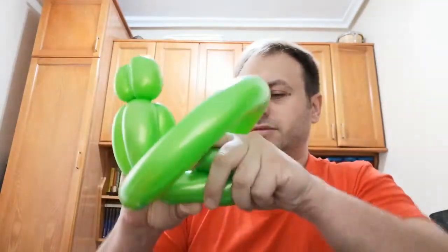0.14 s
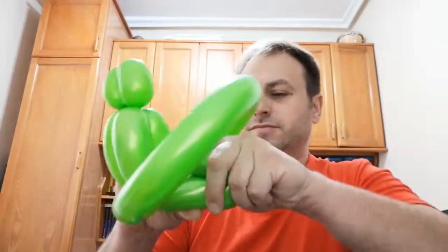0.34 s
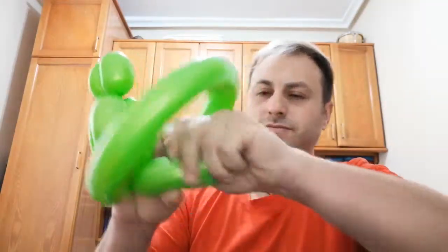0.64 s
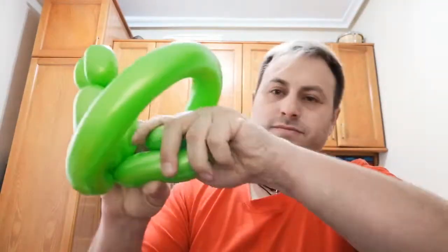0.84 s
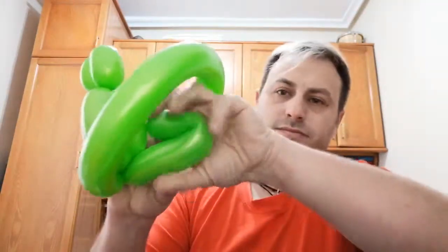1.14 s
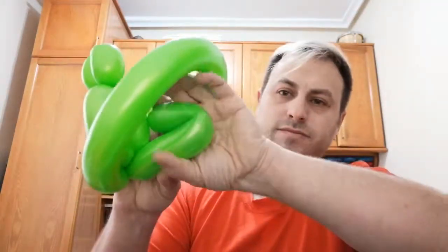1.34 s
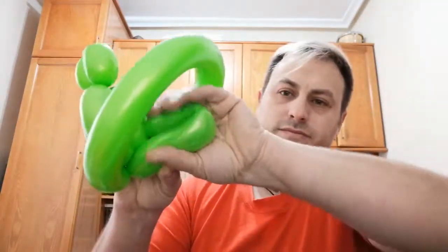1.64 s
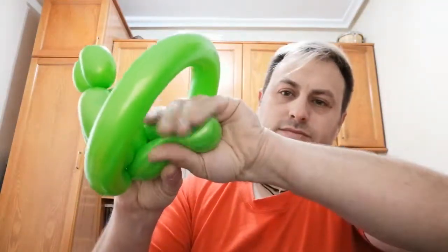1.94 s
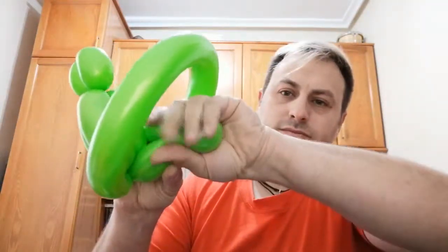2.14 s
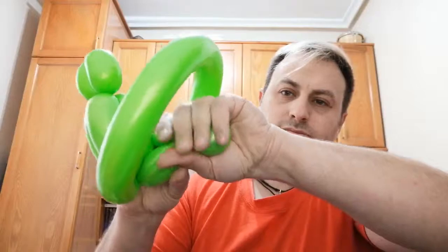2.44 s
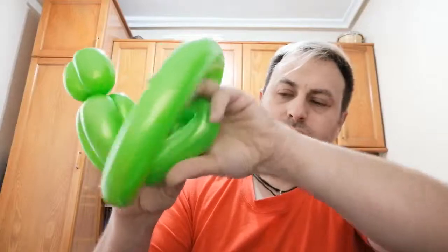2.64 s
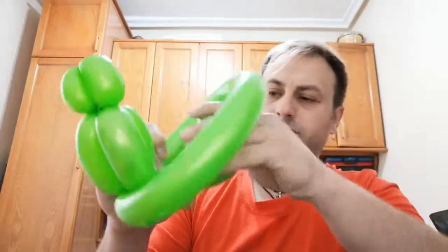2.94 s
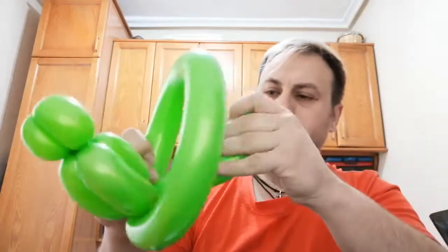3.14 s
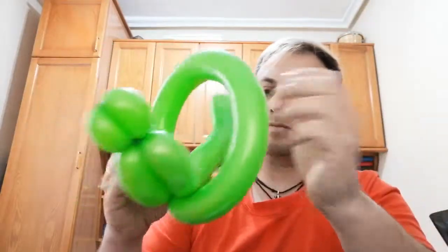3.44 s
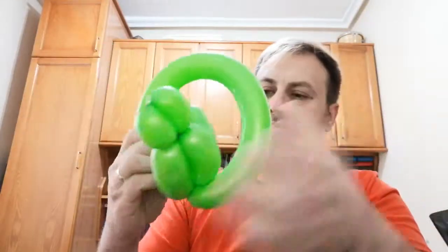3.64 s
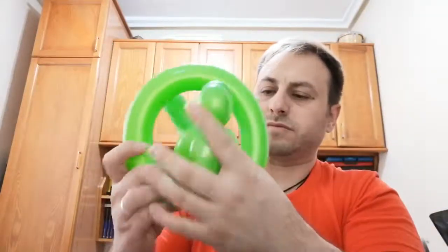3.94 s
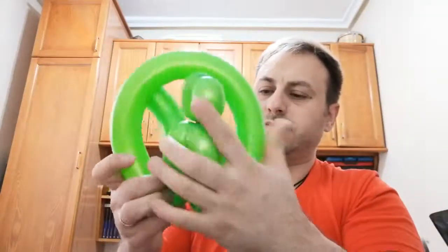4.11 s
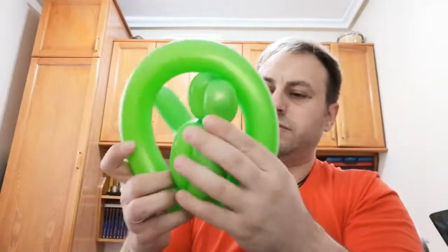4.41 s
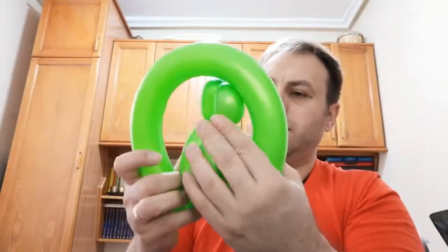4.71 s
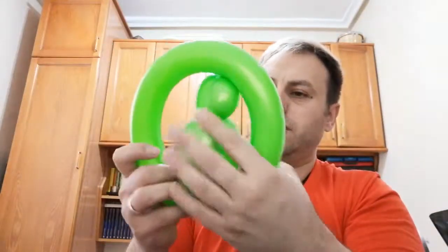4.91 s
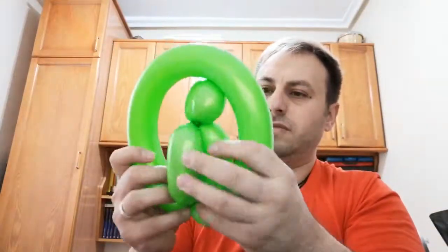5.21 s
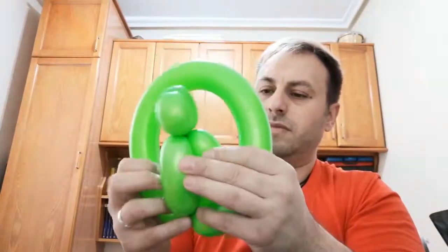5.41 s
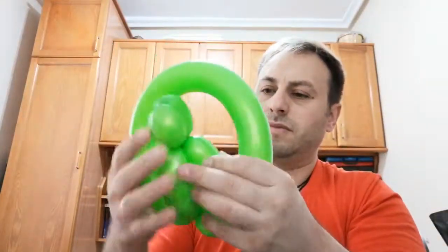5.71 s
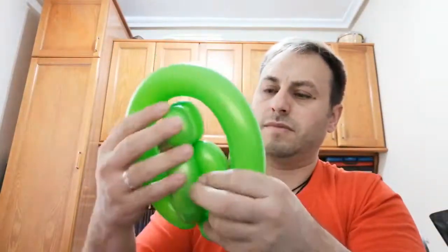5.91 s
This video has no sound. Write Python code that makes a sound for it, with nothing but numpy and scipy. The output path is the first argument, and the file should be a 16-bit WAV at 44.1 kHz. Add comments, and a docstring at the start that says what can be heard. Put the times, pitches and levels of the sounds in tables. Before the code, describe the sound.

Latex rubs on latex and under fingertips, right beside a pair of microphones. It begins with a soft scrape and scattered snaps, gives a quick strong creak, thins out for a moment, then a fast squeak leads into denser snapping. Later strokes drag and groan with low balloon knocks, and a short high chirp stands out before the last crackles. Small indoor room, short tail, very quiet background.

```python
"""A small room, a microphone pair close to twisted latex balloons that are turned and adjusted by hand.
The taut skin sticks and slips: snaps, squeaky runs, short cheeps and fine crackle, built from decaying
sines and shaped noise bursts. Creeping skin sings thinly as narrow-band noise. Fingers drag with a hollow
groan and bump with low thuds. Decaying noise gives the short wall tail, steady low noise the room air."""
import sys
import numpy as np
from scipy import signal
from scipy.fft import rfft, irfft
from scipy.io import wavfile
from scipy.ndimage import uniform_filter1d

SR = 44100
rng = np.random.default_rng(int(sys.argv[2]) if len(sys.argv) > 2 else 0)


def file_out(sig):
    """Save sig as 16-bit WAV at sys.argv[1]."""
    # one column per channel
    cols = np.atleast_2d(sig).T
    # limit, then scale
    lim = np.clip(cols, -1, 1)
    pcm = np.round(lim * 32767).astype(np.int16)
    wavfile.write(sys.argv[1], SR, pcm)


N = 267157
TIME = np.arange(N) / SR
SLIP_S, BLOW_S = .0136, .005  # length of one slip sound; its first part, over which its level is set


def undb(db):
    """Decibels to gain."""
    return 10 ** (np.asarray(db) / 20)


def unit(x):
    """Scale to rms 1."""
    return x / np.sqrt(np.mean(x ** 2))


def colour(x, points, size=2048):
    """Causal minimum-phase filter with the given (Hz, dB) response."""
    hz, db = np.transpose(points)
    grid = np.log(np.fft.rfftfreq(size, 1 / SR) + 1)
    log_gain = np.interp(grid, np.log(hz), db) * np.log(10) / 20
    # folding the cepstrum onto positive time makes the response causal
    cepstrum = irfft(log_gain)[:size // 2]
    cepstrum[1:] *= 2
    response = irfft(np.exp(rfft(cepstrum, size)))[:min(size // 2, x.shape[-1])]
    response = response.reshape((1,) * (x.ndim - 1) + (-1,))
    return signal.fftconvolve(x, response, axes=-1)[..., :x.shape[-1]]


def lay(times, sounds, db):
    """Put short stereo sounds on the time line, each with its rms level set over the first BLOW_S."""
    size = sounds.shape[-1]
    out = np.zeros((2, N + size))
    blow_rms = np.sqrt(np.mean(sounds[..., :int(BLOW_S * SR)] ** 2, axis=(1, 2)))
    gains = undb(db) / blow_rms
    starts = np.clip(times * SR, 0, N - 1).astype(int)
    for start, sound, gain in zip(starts, sounds, gains):
        out[:, start:start + size] += gain * sound
    return out[:, :N]


def wander(span_s):
    """A smooth random drift of rms 1: noise averaged twice over span_s."""
    size = int(span_s * SR) + 1
    smooth = uniform_filter1d(rng.standard_normal(N), size)
    return unit(uniform_filter1d(smooth, size))


def low_noise(points, spread):
    """Coloured noise, mostly alike on both sides; spread is the part that differs."""
    noise = rng.standard_normal((3, N))
    return unit(colour(noise[:1] + spread * noise[1:], points))


def gesture(start, length, attack_s, ease_db_per_s, release_s):
    """Envelope of one movement: an attack centred on start, a slowly easing hold, an exponential release."""
    t = TIME - start
    attack = np.clip(t / attack_s + .5, 0, 1)
    hold = undb(-ease_db_per_s * np.clip(t, 0, length))
    return attack * hold * np.exp(-np.maximum(t - length, 0) / release_s)


def bursts(count, decay_s, spread, rise_s=0.00013):
    """Short noisy ripples of the skin; spread is the part that differs between left and right."""
    t = np.arange(int(SLIP_S * SR)) / SR
    noise = rng.standard_normal((count, 3, len(t)))
    envelope = np.exp(-t / decay_s) * (1 - np.exp(-t / rise_s))
    return (noise[:, :1] + spread * noise[:, 1:]) * envelope


def tear(sounds, stage=0.51, stage_s=.003):
    """Contact lets go in two stages: a second release of random strength 0.9 to 3.9 ms later."""
    chance = rng.uniform(0, 1, (len(sounds), 2, 1))
    f = np.fft.rfftfreq(sounds.shape[-1], 1 / SR)
    lag_s = stage_s * (0.2983 + chance[:, 1:])
    again = 2 * stage * chance[:, :1] * np.exp(-2j * np.pi * f * lag_s)
    return irfft(rfft(sounds) * (1 + again), sounds.shape[-1])


# The voice of the taut skin. Each row: frequency in Hz, gain in dB.
SKIN_COLOUR = [(400, -3.5), (720, 1.5), (1050, 8.5), (1280, 1.5), (1600, 3.5), (2150, -5.5), (2450, 2.5),
               (3100, -6.5), (4500, -23)]


def rings(hz, decay_s=0.00076, rise_s=0.00021, sag=0.32, sag_s=0.0011, ripple_db=-5,
          ripple_s=0.0038, width_hz=1700, echo=0.73, echo_s=0.00247):
    """A released patch of latex swings a few cycles, sinking in pitch; ripples scatter round the balloon."""
    t = np.arange(int(SLIP_S * SR)) / SR
    chance = rng.standard_normal((len(hz), 2, 1))
    hz = hz[:, None, None]
    fade = decay_s * np.exp(0.14 * chance[:, :1])
    # the pitch starts 15 % above the nominal ring and sinks to 13 % below it
    stretch = t + sag * sag_s * (1 - np.exp(-t / sag_s))
    swing = np.sin(2 * np.pi * 0.87 * hz * stretch)
    swing *= (1 - np.exp(-t / rise_s)) * np.exp(-t / fade)
    swing *= np.sign(chance[:, 1:])  # pushes or pulls at random
    f = np.fft.rfftfreq(len(t), 1 / SR) + 1
    # the neighbouring balloons throw the swing back, a little differently to each side
    lag_s = echo_s * rng.uniform(0.425, 1, (len(hz), 2, 1))
    swing = irfft(rfft(swing) * (1 + echo * np.exp(-2j * np.pi * f * lag_s)), len(t))
    resonance = 1 / (1 + 1j * (f ** 2 - hz ** 2) / (f * width_hz))
    ripples = irfft(rfft(bursts(len(hz), ripple_s, spread=0.86)) * resonance ** 2, len(t))
    return colour(unit(swing) + undb(ripple_db) * unit(ripples), SKIN_COLOUR)


# The bright crack at the contact, also heard in the hiss. Each row: frequency in Hz, gain in dB.
CRACK_COLOUR = [(1760, -13.5), (3000, -1.5), (4290, -5.5), (5230, -4), (6130, -9.5), (7590, -8.5),
                (8350, -15.5), (9070, -9), (10300, -11.5), (11500, -9), (15500, -33)]
# The knock of the enclosed air. Each row: frequency in Hz, gain in dB.
BODY_COLOUR = [(50, -11.5), (95, -5), (150, 2), (230, -3.5), (360, -1.5), (520, 3.5), (750, -6.5),
               (1200, -21.5)]
# Snaps that stand out, close to the pair. Each row: start in seconds, ring level in dB,
# nominal ring in Hz, crack in dB over the ring, body in dB over the ring.
SNAPS = [(0.1315, -21, 2040, -11.5, -11.5), (0.1664, -25, 1960, -13, -11), (.281, -39, 1250, -14, -16),
         (0.5444, -30, 2400, -0.5, -15), (0.5524, -20.5, 1830, -2, -10.5), (0.6227, -29, 2550, 4, -29),
         (0.674, -19.5, 2020, -1, -40), (.6907, -23, 2000, 1.5, -53), (0.7003, -21.5, 2000, -13, -40),
         (0.8241, -33.5, 2070, -12, -30), (0.8784, -29.5, 2200, -13, -20), (0.893, -27, 2170, -7.5, -33),
         (0.9463, -27, 2120, -13, -23), (1.0387, -24, 1980, -8.5, -30), (1.137, -32.5, 2100, 0.5, -16),
         (1.158, -29.5, 2130, -4, -13), (1.402, -26.5, 1970, -13, -32), (1.419, -21, 1680, -9, -25),
         (1.661, -32, 2000, -13, -40), (1.672, -27, 2020, -9, -45), (1.7559, -21.5, 1830, -9, -27),
         (1.767, -13.5, 2030, -13.5, -16.5), (1.875, -30.5, 1800, -8.5, -8.5),
         (2.0263, -22.5, 1900, 0.5, -17.5), (2.1995, -37, 1860, -2, -10), (2.4134, -42, 1790, 7, -18),
         (2.4315, -23.5, 2000, -7, -15), (2.7503, -20, 2050, -4, -17), (2.8094, -15.5, 2000, -3.5, -17),
         (2.9116, -17, 2090, -4, -9.5), (3.0177, -20, 1900, -13, -9.5), (3.0446, -20, 2260, -6.5, -8),
         (3.0561, -19, 1840, -10, -15), (3.0826, -28.5, 1830, 1.5, -24), (3.146, -27, 1880, -2.5, -14),
         (3.3485, -27.5, 2290, 1, -16), (3.4776, -31.5, 1910, 1.5, -5), (3.6225, -33, 1760, 1.5, -32),
         (3.652, -29.5, 1590, -1, -20), (3.693, -25, 1860, -2.5, -17), (3.7301, -23, 1880, -5.5, -8),
         (3.7847, -24.5, 1850, -8, -14.5), (3.843, -17, 1840, -6, -12.5), (3.881, -19.5, 2090, -7.5, -25),
         (3.924, -22, 2000, -6, -16), (4.267, -26.5, 2110, -2, -4.5), (4.331, -24.5, 1830, -10, -8),
         (4.3792, -18, 1700, -7.5, -10), (4.4113, -21, 2040, -14, -23), (4.4689, -17, 1690, -7.5, -11),
         (4.5791, -25.5, 2100, -22, -17), (4.6129, -19.5, 1300, -7, -7), (4.6805, -26.5, 2070, -15, -5),
         (4.7152, -24, 1340, -13, -10), (4.749, -29.5, 1970, -10, -17), (4.917, -26, 1590, -9.5, -9),
         (5.1598, -23.5, 1770, -14.5, -8), (5.1939, -28, 1970, -9, -3), (5.2318, -24, 1880, -12, -10),
         (5.2994, -20.5, 2000, -7, -20), (5.313, -15, 1320, -26, -5.5), (5.5026, -17.5, 2270, -6, -14.5),
         (5.5079, -15.5, 2220, -19, -7.5), (5.573, -20.5, 2010, -11, -10.5), (5.7693, -28, 2000, -8.5, -17),
         (5.9349, -21.5, 1960, -5.5, -21), (5.9844, -26, 1910, -14, -31)]


def snaps(times, db, hz, crack_db, body_db, sharp=0.12, sharpen=0.14, lean_db=0.73):
    """Each slip gives a ring, a bright crack at the contact and a knock of the enclosed air."""
    crack = tear(bursts(len(times), decay_s=.001, spread=3.25))
    # the harder the crack, the further up its treble reaches
    edge = np.clip(sharp + sharpen * crack_db, -.8, .8).reshape(-1, 1, 1)
    crack = colour(crack - edge * np.roll(crack, 1, axis=-1), CRACK_COLOUR)
    body = colour(bursts(len(times), decay_s=0.0037, spread=3.5), BODY_COLOUR)
    ring = rings(hz) * undb(lean_db * np.array([[1], [-1]]))  # leans to the left
    return lay(times, ring, db) + lay(times, crack, db + crack_db) + lay(times, body, db + body_db)


# Runs of slips, from slow creaks to quick squeaks. Each row: start in seconds, length in seconds,
# first rate in Hz, last rate in Hz, first ring level in dB, last ring level in dB, nominal ring in Hz,
# crack in dB over the ring, body in dB over the ring.
SQUEAKS = [(0.0513, 0.015, 148.8, 150.3, -31, -23, 1890, -32, -27),
           (0.702, 0.014, 247, 328, -30, -32, 1960, -7, -27),
           (.968, 0.028, 136.2, 127.8, -32.5, -22, 2000, -6.5, -37),
           (1.067, 0.031, 153.7, 168.2, -29, -30, 2180, -3, -34),
           (1.221, 0.031, 197.8, 171, -22.5, -33.5, 2040, -7, -18.5),
           (1.261, .13, 99.7, 87.6, -34.5, -38.5, 2200, -6, -18),
           (1.4327, 0.082, 117.6, 44, -16, -13, 1910, -9, -14),
           (1.947, .045, 49.1, 48.9, -27.5, -24.5, 1900, -4.5, -18),
           (2.582, 0.044, 124.4, 420.4, -28.5, -17.5, 1780, -6.5, -12),
           (3.237, 0.033, 93.6, 93.3, -32.5, -33, 2130, -2.5, -17),
           (3.8957, 0.017, 198.5, 268.7, -24, -27.5, 1820, -11, -12),
           (4.069, 0.016, 130.5, 131.3, -24, -23.5, 1810, -3.5, -13),
           (4.516, .013, 281, 402, -25, -26.5, 1110, -10, -11),
           (4.842, .09, 66.1, 69.7, -29.5, -30, 1730, -13.5, -11),
           (4.995, 0.072, 169.4, 139, -34, -39.5, 1150, -12, -12),
           (5.8672, 0.02, 79.6, 140.7, -22.5, -27.5, 2300, -8, -31)]


def squeak(start, length, first_hz, last_hz, first_db, last_db, ring_hz, crack_db, body_db, detune=0.038):
    """A run of slips whose rate rises or falls with the speed of the hand."""
    t = np.arange(0, length, 1 / SR)
    rate = np.geomspace(first_hz, last_hz, len(t))
    cycles = np.floor(np.cumsum(rate) / SR)
    times = t[np.diff(cycles, prepend=-1) > 0]  # one slip at each new cycle
    db = np.interp(times, [0, length], [first_db, last_db])
    hz = ring_hz * np.exp(detune * rng.standard_normal(len(times)))
    return snaps(start + times, db, hz, crack_db, body_db)


# Short shrill cheeps. Each row: start in seconds, level in dB, pitch in Hz.
CHEEPS = [(5.5019, -13.5, 1287), (5.508, -23, 1280), (5.5172, -20.5, 1307)]


def cheeps(swell_s=0.0017, overtones_db=(-1, 0, -12, -7, -17, -11)):
    """For a few cycles the slips lock into a shrill tone: a harmonic series that swells and dies."""
    times, db, hz = np.transpose(CHEEPS)
    t = np.arange(int(SLIP_S * SR)) / SR
    phase = 2 * np.pi * hz[:, None, None] * t
    tone = 0
    for harmonic, level_db in enumerate(overtones_db, start=1):
        offset = rng.uniform(0, np.pi, (len(hz), 2, 1))
        tone = tone + undb(level_db) * np.sin(harmonic * phase + offset)
    return lay(times, tone * t * np.exp(-t / swell_s), db)


STROKE_ATTACK_S, STROKE_EASE_DB_PER_S, STROKE_RELEASE_S = 0.028, 6.5, 0.017


def slide(start, length):
    """Envelope of latex sliding on latex: it takes hold, eases off slowly and lets go."""
    return gesture(start, length, STROKE_ATTACK_S, STROKE_EASE_DB_PER_S, STROKE_RELEASE_S)


# Strokes of latex on latex. Each row: start in seconds, length in seconds, scrape strength in dB,
# hiss strength in dB, both before the mix in crackle().
STROKES = [(0, 0.18, -30.5, -42), (0.266, 0.048, -44.5, -47.5), (0.542, 0.11, -39.5, -32.5),
           (0.677, 0.043, -42, -34), (0.785, 0.2, -40, -49), (.935, 0.048, -32.5, -30),
           (1.071, 0.048, -25.5, -32), (1.223, 0.049, -28, -38), (1.287, 0.13, -42, -40.5),
           (1.427, 0.043, -30, -39), (1.761, 0.16, -35, -47), (1.982, 0.078, -36, -49),
           (2.094, 0.1, -43.5, -68), (2.289, 0.059, -48.5, -51), (2.421, 0.037, -34.5, -37.5),
           (2.565, 0.067, -20, -29), (2.664, 0.09, -38, -41), (2.749, 0.018, -26, -31),
           (2.81, 0.23, -35.5, -43), (3.044, 0.041, -29.5, -33), (3.128, 0.12, -39.5, -59),
           (3.35, 0.03, -39, -50), (3.474, 0.03, -36, -39.5), (3.632, 0.2, -32, -37),
           (3.868, 0.06, -26.5, -26.5), (3.962, 0.26, -29, -39), (4.262, 0.047, -22, -30.5),
           (4.351, 0.22, -24.5, -36), (4.605, 0.32, -30, -43.5), (4.99, 0.098, -33.5, -44),
           (5.16, 0.13, -28, -36), (5.291, 0.084, -26, -35), (5.39, 0.092, -33.5, -38.5),
           (5.504, 0.072, -31, -30.5), (5.612, 0.21, -39.5, -43), (5.865, 0.031, -27, -30),
           (5.927, 0.017, -25, -34.5), (5.985, 0.088, -39.5, -48)]


def strokes():
    """Strength of the scrape and of the hiss over time, summed over all strokes."""
    return sum(undb([[scrape_db], [hiss_db]]) * slide(start, length)
               for start, length, scrape_db, hiss_db in STROKES)


def shifting(x, depth_db=3.5, span_s=0.035):
    """As the contact travels, different resonances of the skin take turns: four lower bands drift in level."""
    out = 0
    for hz in (900, 1300, 1800, 2300):
        below = signal.sosfiltfilt(signal.butter(4, hz, fs=SR, output="sos"), x)
        out = out + below * undb(depth_db * wander(span_s))
        x = x - below
    return out + x


# The dull scrape of skin on skin. Each row: frequency in Hz, gain in dB.
SCRAPE_COLOUR = [(300, -17.5), (520, -11), (650, -16), (780, -6), (1050, 0), (1280, -2.5), (1650, 1),
                 (2350, -0.5), (3000, -8), (4500, -21), (9000, -36)]


def crackle(scrape_gain, hiss_gain, slips_per_s=450, scatter_db=3.5, grain_db=-5, tick_db=-5, hiss_db=-6,
            smooth_db=-8, slide_db=-12, bunch_db=1.5):
    """Tiny uneven slips while latex slides: each scrapes the skin and ticks, over a fine smooth friction."""
    chance = rng.standard_normal((int(slips_per_s * N / SR), 2))
    times = np.cumsum(np.exp(.7 * chance[:, 0]))  # uneven gaps
    times *= N / SR / times[-1]
    db = scatter_db * np.minimum(chance[:, 1], 2)
    grains = unit(lay(times, bursts(len(times), decay_s=0.0013, spread=0.97), db))
    rubbed = grains + undb(slide_db) * rng.standard_normal((2, N))
    scrape = unit(shifting(colour(rubbed, SCRAPE_COLOUR)))
    ticks = unit(lay(times, bursts(len(times), decay_s=0.00063, spread=1.3), db))
    friction = undb(tick_db) * ticks + undb(smooth_db) * rng.standard_normal((2, N))
    hiss = unit(colour(friction, CRACK_COLOUR))
    # the grip catches and lets go, so the crackle swells and thins
    bunches = unit(undb(bunch_db * wander(0.0044)))
    return bunches * (undb(grain_db) * scrape_gain * scrape + undb(hiss_db) * hiss_gain * hiss)


STRAY_PER_S, STRAY_HZ = 30, 1954  # rate of the stray slips; their nominal ring
STRAY_DB, STRAY_SCATTER_DB = -5.5, 4  # counted from the scrape strength


def strays(scrape_gain, crack_db=-8, body_db=-12, detune=0.069):
    """A sliding patch catches and gives a faint snap, as strong as the stroke allows."""
    count = int(STRAY_PER_S * N / SR)
    place = (np.arange(count) + rng.uniform(0, 1, count)) / count
    chance = rng.standard_normal((count, 2))
    strength = scrape_gain[(place * (N - 1)).astype(int)]
    db = 20 * np.log10(strength + 1e-9) + STRAY_DB + STRAY_SCATTER_DB * chance[:, 0]
    hz = STRAY_HZ * np.exp(detune * chance[:, 1])
    return snaps(place * N / SR, db, hz, crack_db, body_db)


SING_WIDTH_HZ = 300  # of each of two filter passes
# A patch of skin sings thinly while it creeps. Each row: start in seconds, length in seconds,
# level in dB, pitch in Hz.
SINGS = [(0, 0.15, -42, 2250), (0.267, 0.12, -58, 2200), (.7, 0.65, -50, 2300), (1.528, .13, -43, 1900),
         (2.632, .06, -47, 2380), (5.536, 0.085, -38, 2480), (5.626, 0.093, -43, 2350),
         (5.87, 0.088, -54, 2400)]


def sing():
    """Friction keeps one narrow resonance of the stretched skin going: noise through a peak filter."""
    noise = rng.standard_normal((3, N))
    out = 0
    for start, length, db, hz in SINGS:
        b, a = signal.iirpeak(hz, hz / SING_WIDTH_HZ, fs=SR)
        tone = signal.lfilter(b, a, signal.lfilter(b, a, noise[0] + noise[1:]))
        out = out + unit(tone) * undb(db) * slide(start, length)
    return out


DRAG_ATTACK_S, DRAG_EASE_DB_PER_S, DRAG_RELEASE_S = 0.014, 6, 0.032
JUDDER_SAG_OCTAVES_PER_S = 0.55
# The rumble under the fingertips. Each row: frequency in Hz, gain in dB.
FINGER_COLOUR = [(25, -24), (70, -10.5), (170, -3), (300, -7.5), (500, -14.5), (900, -32)]
# Fingertips dragging over a balloon. Each row: start in seconds, length in seconds,
# strength in dB before the groan and rumble mix, judder in Hz halfway through the drag.
DRAGS = [(0, 0.16, -42, 205), (1.238, 0.49, -50.5, 250), (2.583, 0.12, -46, 220), (2.771, 0.17, -40, 175),
         (3.032, 0.058, -36.5, 178), (3.138, .13, -45.5, 250), (3.717, .2, -45, 240),
         (4.006, .07, -32, 295), (4.128, 0.056, -30, 215), (4.266, .06, -33.5, 305),
         (4.371, .33, -37.5, 270), (4.786, 0.095, -43, 230), (5.018, 0.11, -43, 195),
         (5.19, 0.21, -38, 310), (5.61, 0.053, -42.5, 290), (5.714, .07, -38, 190)]


def drags(groan_db=-1, overtone_db=-10, rumble_db=-6, grip_db=-45, grip_range_db=3, waver=.12, flutter_db=2.5):
    """Fingertips drag over the balloons and judder with a sinking hollow groan when they grip."""
    bend = np.exp(waver * wander(0.00429))
    flutter = unit(undb(flutter_db * wander(0.0048)))
    rumble = undb(rumble_db) * low_noise(FINGER_COLOUR, spread=0.39)
    out = np.zeros((2, N))
    for start, length, db, hz in DRAGS:
        grip = 1 / (1.5 + np.exp((grip_db - db) / grip_range_db))  # stronger drags groan more
        past_middle = np.clip(TIME - start - length / 2, -length, length)
        pitch = hz * 2 ** (-JUDDER_SAG_OCTAVES_PER_S * past_middle)
        phase = 2 * np.pi * np.cumsum(pitch * bend) / SR
        groan = undb(groan_db) * grip * unit(np.sin(phase) + undb(overtone_db) * np.sin(2 * phase))
        envelope = gesture(start, length, DRAG_ATTACK_S, DRAG_EASE_DB_PER_S, DRAG_RELEASE_S)
        out += (groan + rumble) * (flutter * undb(db) * envelope)
    return out


# Fingers bumping a balloon. Each row: start in seconds, strength in dB before rise and decay,
# pitch in Hz, decay in seconds.
BUMPS = [(.553, -33.5, 344, 0.0093), (1.094, -21.5, 336, 0.002), (1.451, -35.5, 91, 0.054),
         (3.052, -14, 164, 0.004), (3.073, -22, 56, 0.022), (3.082, -18, 159, 0.0061),
         (3.814, -25.5, 230, 0.0048), (4.127, -22, 239.8, 0.0051), (4.144, -17.5, 208, 0.006),
         (4.182, -29, 150, 0.0092), (4.381, -18.5, 88, 0.017), (4.612, -10, 101, 0.006),
         (4.716, -18.5, 112, 0.0062), (5.316, -18.5, 86, 0.024), (5.64, -27.5, 297, .008),
         (5.726, -24, 230, 0.0044), (5.762, -26, 161, 0.004)]


def bumps(rise_s=0.0013):
    """A finger's bump sets the balloon swinging briefly: a low, quickly dying sine."""
    t = np.arange(SR // 5) / SR
    out = np.zeros((2, N))
    for start, db, hz, decay_s in BUMPS:
        envelope = (1 - np.exp(-t / rise_s)) * np.exp(-t / decay_s)
        thud = undb(db) * np.sin(2 * np.pi * hz * t) * envelope
        i = int(start * SR)
        out[:, i:i + len(t)] -= thud[:N - i]
    return out


ROOM_T60_LOW_S, ROOM_T60_HIGH_S, ROOM_DB = 0.41, 0.39, -6.5
# The sound of the walls. Each row: frequency in Hz, gain in dB.
WALL_COLOUR = [(60, -24.5), (300, 3.5), (900, 1.5), (1900, -0.5), (3500, 0.5), (7000, -0.5), (14000, -2)]


def room(x, split_hz=4000, gap_s=0.0028, early_db=3, early_s=0.0033, move_hz=1.3):
    """Near surfaces answer first, then the walls; the treble dies sooner."""
    t = np.arange(SR * 3 // 4) / SR
    low_pass, high_pass = (signal.butter(2, split_hz, kind, fs=SR, output="sos") for kind in ("low", "high"))
    out = x
    # as the figure moves, the sound swings steadily between two sets of reflections
    for share in (np.cos(2 * np.pi * move_hz * TIME), np.sin(2 * np.pi * move_hz * TIME)):
        noise = rng.standard_normal((2, len(t)))
        low = signal.sosfilt(low_pass, noise) * np.exp(-np.log(1000) * t / ROOM_T60_LOW_S)
        high = signal.sosfilt(high_pass, noise) * np.exp(-np.log(1000) * t / ROOM_T60_HIGH_S)
        tail = low - high
        tail *= np.clip(t / gap_s - .5, 0, 1) * (1 + undb(early_db) * np.exp(-t / early_s))
        tail = colour(unit(tail) / np.sqrt(len(t)), WALL_COLOUR)
        out = out + undb(ROOM_DB) * signal.fftconvolve(x * share, tail, axes=-1)[:, :N]
    return out


AIR_DB = -57
# The quiet air of the room. Each row: frequency in Hz, gain in dB.
AIR_COLOUR = [(25, -1.5), (65, 2), (130, -2), (400, -17.5), (1500, -5), (6000, -22), (15000, -29)]


def air():
    """Steady faint background: coloured noise, partly alike on both sides."""
    return undb(AIR_DB) * low_noise(AIR_COLOUR, spread=0.62)


def scene():
    """Snaps, squeaks, crackle and handling in a quiet room."""
    scrape_gain, hiss_gain = strokes()
    slips = snaps(*np.transpose(SNAPS)) + sum(squeak(*row) for row in SQUEAKS) + cheeps()
    rubbing = crackle(scrape_gain, hiss_gain) + strays(scrape_gain) + sing()
    fingers = drags() + bumps()
    return room(slips + rubbing + fingers) + air()


TOP_HZ = 15200
# The close microphone pair. Each row: frequency in Hz, left minus right in dB.
PORTS = [(60, -0.5), (250, -0.5), (500, -3.5), (1000, 2.5), (2200, 2), (3200, 2), (4800, -1.5), (8000, -9),
         (11500, 5), (16000, 1.5)]


def record(dry, bass_hz=210, side_db=1):
    """Two close ports hear the bass nearly alike and colour the treble differently; the top is cut."""
    mid, side = (dry[0] + dry[1]) / 2, (dry[0] - dry[1]) / 2
    bass_cut = signal.butter(1, bass_hz, "high", fs=SR, output="sos")
    side = undb(side_db) * signal.sosfilt(bass_cut, side)
    ports = [colour(mid + sign * side, [(hz, sign * db / 2) for hz, db in PORTS]) for sign in (1, -1)]
    top_cut = signal.ellip(8, .2, 80, TOP_HZ, fs=SR, output="sos")
    return signal.sosfilt(top_cut, np.clip(ports, -1, 1))


dry = scene()
out = record(dry)
file_out(out)
```